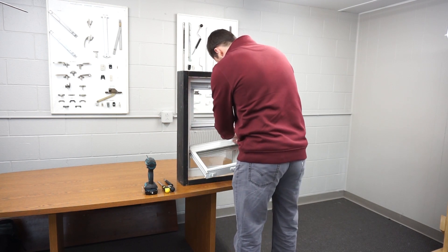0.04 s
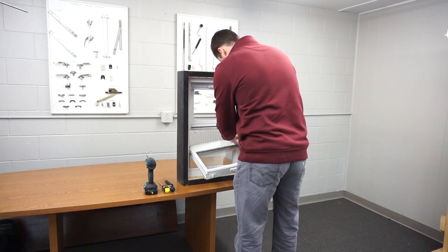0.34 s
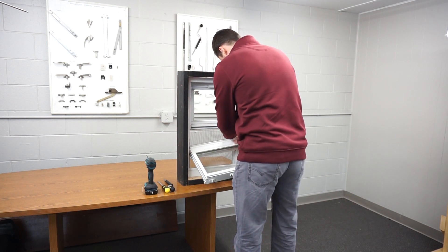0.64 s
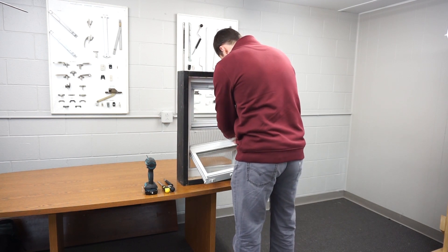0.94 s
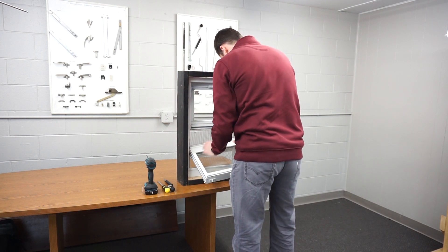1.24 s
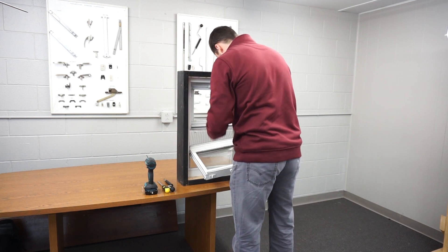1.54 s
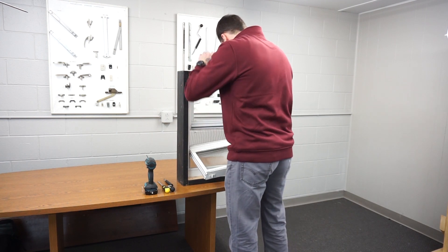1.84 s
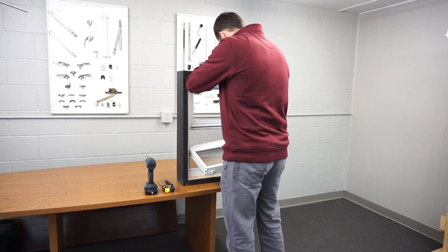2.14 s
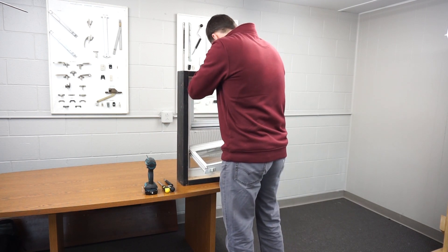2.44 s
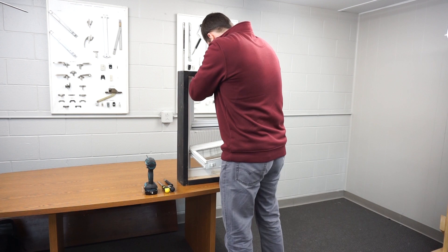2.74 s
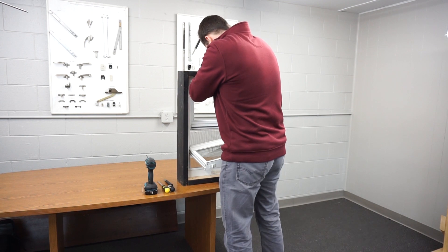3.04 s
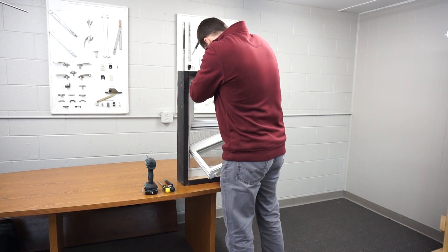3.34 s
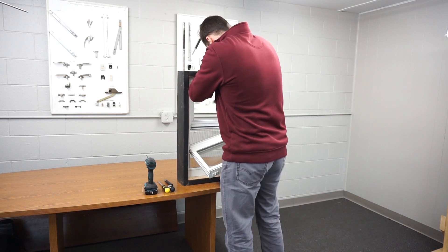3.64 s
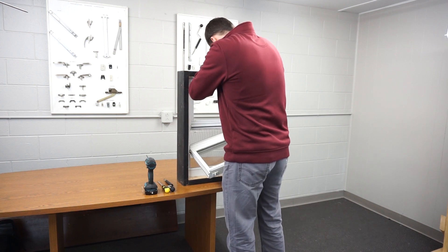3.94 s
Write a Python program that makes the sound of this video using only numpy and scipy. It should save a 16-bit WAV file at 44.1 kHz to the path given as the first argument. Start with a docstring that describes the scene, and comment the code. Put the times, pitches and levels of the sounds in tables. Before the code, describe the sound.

After soft clicks and rustles of handling, a vinyl window sash gives two short squeaks, knocks to a stop and latches with a snap. One microphone picks it up with a brief ring off bare walls.

```python
"""A vinyl window sash is pulled along its track: it squeaks twice, bumps to a stop and a latch snaps.
The window stands on a table in a bare block-walled room, heard on one microphone. Before the pulls,
small parts click over a low handling rumble and a sleeve rustles. The squeak is vinyl sticking and
slipping; knocks set the frame ringing. Squeaks, knocks and clicks reach the microphone directly,
then as a brief ring off the walls."""
import sys
import numpy as np
from scipy import signal
from scipy.fft import rfft, irfft
from scipy.io import wavfile
from scipy.ndimage import uniform_filter1d

SR = 44100
rng = np.random.default_rng(int(sys.argv[2]) if len(sys.argv) > 2 else 0)


def int16_out(signal):
    """Quantize to a 16-bit WAV file."""
    q = np.round(np.clip(np.atleast_2d(signal).T, -1, 1) * 32767)
    wavfile.write(sys.argv[1], SR, q.astype(np.int16))


N = 176400
T = np.arange(N) / SR

# Decay of the room: freq_hz, t60_s
ROOM_DECAY = [(100, 0.44), (500, 0.5366), (1200, 0.59), (2700, 0.13), (5500, 0.47), (9000, 0.33),
              (15000, 0.06)]
# Colour of its tail: freq_hz, gain_db
TAIL_COLOUR = [(100, -11.5), (250, -2.5), (520, -2.5), (1100, -1.5), (2500, -2), (6000, -5.5), (14000, -7)]
# Early reflections at the microphone: delay_s, gain
REFLECTIONS = [(.0042, 0.15), (0.0116, 0.095), (0.0192, 0.087), (0.027, 0.085)]

# Spectra of room tone, rumble, rubbing parts, sleeve, hands, fingers, track grit: freq_hz, relative_db
AIR_SPECTRUM = [(20, 14.5), (70, -14.5), (160, -3.5), (300, -20), (1000, -41.5), (3000, -26.5), (8000, -43),
                (16000, -49)]
RUMBLE_SPECTRUM = [(10, 5.5), (25, 3.5), (45, -0.5), (75, -1.5), (120, -11), (200, -23.5), (300, -44.5),
                   (600, -40), (2000, -80.5)]
PARTS_SPECTRUM = [(100, 7.5), (300, 7.5), (700, 1.5), (1300, -3), (1700, -10.5), (2800, -13.5),
                  (3800, -11.5), (4500, -12.5), (5500, -14.5), (7500, -17.5), (11000, -22), (16000, -26.5)]
SLEEVE_SPECTRUM = [(500, -10), (2000, 0), (4000, -7.5), (6000, -0.5), (9000, -2.5), (12000, -3),
                   (14500, -2), (16000, 1.5)]
HANDS_SPECTRUM = [(60, 11), (150, -4.5), (280, -0.5), (600, -1), (1200, -13), (2000, -15.5), (4000, -33.5),
                  (10000, -43)]
FINGER_SPECTRUM = [(1000, -23), (5000, -6), (8000, -10), (11000, 0.5), (13500, -12), (16000, -4)]
GRIT_SPECTRUM = [(150, -12), (500, 5.5), (1100, 2), (2000, -1.5), (3500, -10.5), (7000, -10.5),
                 (10000, -21.5), (15000, -21.5)]
# Rise and fall of the handling noises: time_s, level_db
RUMBLE_CURVE = [(0, -34), (.1, -29), (.25, -33), (.5, -31.5), (.6, -33), (.95, -38.5), (1.1, -47),
                (1.3, -53.5), (1.45, -57), (1.65, -54.5), (1.77, -44.5), (1.9, -55), (2.3, -47),
                (2.62, -59), (2.8, -39), (2.86, -43.5), (3.0, -34), (3.22, -50), (3.29, -47.5),
                (3.36, -35.5), (3.47, -42), (3.7, -56), (4, -59)]
PARTS_CURVE = [(0, -52.5), (.1, -55.5), (.22, -57.5), (.45, -61.5), (.6, -65), (.9, -62.5), (1.1, -70.5),
               (1.4, -77.5), (1.57, -68), (1.63, -59.5), (1.68, -54), (1.75, -69), (2, -63.5), (4, -67.5)]
SLEEVE_CURVE = [(0, -83), (1.95, -74.5), (2.1, -66), (2.35, -64.5), (2.47, -64.5), (2.58, -62.5),
                (2.7, -65.5), (2.77, -57.5), (2.87, -68.5), (2.93, -58.5), (3.0, -68), (3.2, -68),
                (3.6, -73), (3.78, -69.5), (3.85, -84.5), (4, -71.5)]
HANDS_CURVE = [(0, -88), (1.5, -76.5), (1.85, -58.5), (2.07, -59), (2.2, -59), (2.45, -54), (2.66, -54),
               (2.76, -44.5), (2.86, -60.5), (2.93, -40), (3.02, -61.5), (3.7, -57.5), (3.82, -53.5),
               (3.9, -66), (4, -60)]
# Fingers brushing over plastic: centre_s, length_s, level_db
FINGER_STROKES = [(0.063, .07, -71), (0.328, 0.032, -61), (0.48, 0.012, -62), (0.532, 0.066, -68.5),
                  (0.647, 0.036, -66), (0.84, 0.055, -66), (1.535, .04, -74)]

# Thuds through the table and clinks of a small metal catch: start_s, level_db
TABLE_THUDS = [(0.194, -37.5), (1.700, -51), (2.150, -55), (2.925, -48), (2.975, -35.5), (3.327, -26),
               (3.570, -45.5)]
CATCH_CLINKS = [(0.064, -72), (0.354, -61), (0.854, -41.5)]
# Resonances of table, catch and window frame: freq_hz, t60_s, relative_db
TABLE_MODES = [(52, 0.33, -11.5), (71.6, 0.43, 0), (113.2, 0.07, -2.5), (169, 0.054, -1)]
CATCH_MODES = [(1880, 0.013, -0.5), (2014, 0.027, -4), (3410, 0.027, -4.5), (4350, .025, -4),
               (4720, 0.016, 3), (4950, .02, -10)]
FRAME_MODES = [(189, 0.069, 4.5), (234, .06, -2.5), (289.2, 0.18, 2.5), (344.4, 0.33, -4.5),
               (562, 0.042, 5.5), (810, 0.19, -7.5), (1022.4, 0.14, -0.5), (1092, 0.13, -3),
               (1302, 0.042, 0.5), (1864, 0.017, 3.5), (2052, 0.018, 5), (2700, 0.032, 0)]
# Ticks of stressed plastic: start_s, level_db, upper_modes_db
PLASTIC_TICKS = [(1.52, -66, -2), (2.269, -65, -23), (2.388, -58.5, -30), (3.578, -50, -5),
                 (3.714, -56, -0.5), (3.920, -61, 0)]
# Resonances of the plastic: freq_hz, t60_s
PLASTIC_MODES = [(2420, 0.0057), (4000, 0.0071), (4650, 0.01)]
# Knocks of sash and frame, relative levels in four bands: start_s, bass_db, middle_db, treble_db, top_db
SASH_KNOCKS = [(0.001, -54, -39, -48, -58), (0.051, -48, -41.5, -48, -69), (0.062, -47, -33, -42, -64),
               (0.077, -39, -46, -63, -56.5), (0.194, -44, -71, -68, -84), (0.264, -44.5, -43.5, -62, -73),
               (0.353, -51, -40, -49.5, -77), (0.398, -47.5, -51.5, -63, -74),
               (0.513, -46, -55.5, -57, -80), (0.682, -54.5, -56, -56.5, -66),
               (0.795, -54, -51.5, -60, -71), (0.854, -49, -41.5, -45, -55), (0.999, -64, -71, -64.5, -64),
               (1.499, -58, -67, -72, -84), (1.692, -32.5, -33.5, -50.5, -65),
               (1.703, -33.5, -52, -66, -82), (1.73, -54, -51, -65, -63), (2.151, -37.5, -48.5, -63, -76),
               (2.352, -46, -53.5, -78, -74), (2.388, -49.5, -51.5, -60.5, -78),
               (2.746, -45, -56, -54.5, -57), (2.77, -43, -45.5, -61, -71), (2.797, -44, -50, -68, -71),
               (2.867, -50, -55.5, -80, -73), (2.901, -38, -38.5, -70, -72),
               (2.917, -37.5, -42.5, -55, -62), (2.928, -41, -41, -54.5, -63),
               (2.963, -31, -25.5, -64.5, -67), (3.094, -39, -33.5, -58.5, -64),
               (3.256, -38, -44.5, -59, -65), (3.329, -15.5, -20.5, -32.5, -46.5),
               (3.337, -28, -31, -40.5, -40.5), (3.356, -33, -21, -30, -37), (3.435, -33.5, -23, -26, -29),
               (3.462, -36, -33, -31.5, -43), (3.578, -66, -41, -47, -55.5),
               (3.764, -46.5, -58, -75.5, -76)]
# The rattle in each of those bands: low_hz, high_hz, t60_s, rebound_gain
RATTLE_BANDS = [(135, 366, 0.042, 0.086), (426, 1233, 0.063, 0), (1600, 5320, 0.048, 0.071),
                (5430, 16500, 0.036, 0.1)]

# The sash slipping in its track, one list per pull: time_s, pitch_hz, level_db, overtones_db, grit_db
SASH_PULLS = [
    [(2.935, 597, -69, -3, -3), (2.949, 567.4, -35.5, -3.5, -17.5), (2.956, 555, -21.5, -16.5, -30),
     (2.962, 523, -12.5, -11.5, -40), (2.969, 511, -18.5, -3.5, -33), (2.977, 503, -29.5, 3, -30),
     (2.986, 509, -45.5, -1, -16.5)],
    [(3.258, 494.6, -53, -8.5, -11), (3.273, 485.8, -38, -10, -13), (3.283, 503.3, -25, -7, -31),
     (3.297, 514, -17, 0, -25), (3.304, 531, -12.5, -9.5, -28), (3.311, 558.5, -8.5, -1, -30),
     (3.322, 549.5, -20, 10.5, -9.5), (3.329, 544, -22, 3.5, -7.5), (3.345, 555, -35.5, -1, 4)],
]
# Shape of the squeak's overtones: freq_hz, relative_db
OVERTONE_SPECTRUM = [(1050, -13.5), (1600, -29.5), (2100, -25.5), (2750, -26.5), (3300, -34), (4800, -45),
                     (7000, -51.5)]


def amp(db):
    """Decibels to gain."""
    return 10 ** (np.asarray(db) / 20)


def unit(x):
    """Scales to rms 1."""
    return x / np.sqrt(np.mean(x ** 2) + 1e-20)


def burst(x):
    """Scales a short sound to the energy of 15 ms at rms 1."""
    return x * np.sqrt(.015 * SR / (np.sum(x ** 2) + 1e-20))


def at_hz(points, hz):
    """Reads a table on a log-frequency axis."""
    freqs, values = np.transpose(points)
    return np.interp(np.log(hz + 1), np.log(freqs + 1), values)


def fader(curve):
    """A level curve as gain per sample."""
    return amp(np.interp(T, *np.transpose(curve)))


def add(mix, start_s, sound):
    """Mixes a sound in at a time."""
    part = mix[max(round(start_s * SR), 0):][:len(sound)]
    part += sound[:len(part)]


def coloured(x, spectrum):
    """Gives a signal a spectrum, at rms 1."""
    gain = amp(at_hz(spectrum, np.fft.rfftfreq(len(x), 1 / SR)))
    return unit(irfft(rfft(x) * gain, len(x)))


def wander(rate_hz):
    """Random drift of rms 1, mostly slower than rate_hz."""
    rolloff = 1 + (np.fft.rfftfreq(N, 1 / SR) / rate_hz) ** 4
    return unit(irfft(rfft(rng.standard_normal(N)) / rolloff, N))


def ring(x, hz, t60):
    """One resonance with gain 1 at its peak."""
    radius = np.exp(-np.log(1000) / (t60 * SR))
    pole = radius * np.exp(2j * np.pi * hz / SR)
    return 2 * signal.lfilter([1 - radius], [1, -pole], x).real


def friction(spectrum, grain_db, flutter_db):
    """Dense tiny slips of uneven size, coming in clumps."""
    slips = rng.standard_normal(N) * amp(grain_db * np.minimum(rng.exponential(1, N), 5))
    clumps = amp(flutter_db * wander(rate_hz=64))
    return coloured(slips * clumps, spectrum)


def struck(modes, attack_s):
    """The dying modes of a struck object."""
    t = T[:SR // 5]
    tones = np.zeros(len(t))
    for hz, t60, db in modes:
        tone = np.sin(2 * np.pi * (hz * t + rng.random()))
        tones += amp(db) * burst(amp(-60 * t / t60) * tone)
    return burst(tones * (1 - np.exp(-t / attack_s)))


def blows(events, modes, attack_s):
    """Strikes one object at each listed moment."""
    out = np.zeros(N)
    for start_s, db in events:
        add(out, start_s, amp(db) * struck(modes, attack_s))
    return out


def room_tone(level_db=-63):
    """The faint, steady air of the room."""
    return amp(level_db) * coloured(rng.standard_normal(N), AIR_SPECTRUM)


def room_ring(x, onset_s=0.0084):
    """What the bare walls return: early reflections, then a diffuse tail that dies faster in the treble."""
    hz, t, noise = signal.stft(rng.standard_normal(SR), SR, nperseg=256)
    t60 = at_hz(ROOM_DECAY, hz)[:, None]
    decay = amp(at_hz(TAIL_COLOUR, hz)[:, None] - 60 * t / t60)
    equal_energy = np.sqrt(2 * np.log(1000) / (t60 * SR))
    tail = signal.istft(noise * decay * equal_energy, SR, nperseg=256)[1][:SR]
    tail *= np.minimum(T[:SR] / onset_s, 1)
    for delay_s, gain in REFLECTIONS:
        add(tail, delay_s, np.array([gain]))
    return signal.fftconvolve(x, tail)[:N]


def handling_rumble(lumps_db=3.5):
    """The low, lumpy rumble of the window being handled."""
    lumps = amp(lumps_db * wander(rate_hz=15.7))
    return fader(RUMBLE_CURVE) * coloured(lumps * rng.standard_normal(N), RUMBLE_SPECTRUM)


def rustles():
    """Parts rub, a sleeve slides over the frame, hands shift on the sash, fingers brush the plastic."""
    parts = fader(PARTS_CURVE) * friction(PARTS_SPECTRUM, grain_db=4, flutter_db=0)
    sleeve = fader(SLEEVE_CURVE) * friction(SLEEVE_SPECTRUM, grain_db=4, flutter_db=1.4)
    hands = fader(HANDS_CURVE) * friction(HANDS_SPECTRUM, grain_db=1.5, flutter_db=2.6)
    strokes = sum(amp(db) * np.exp(-(2 * (T - centre_s) / length_s) ** 2)
                  for centre_s, length_s, db in FINGER_STROKES)
    fingers = strokes * friction(FINGER_SPECTRUM, grain_db=-1, flutter_db=1.5)
    return parts + sleeve + hands + fingers


def table_thuds():
    """Dull blows ring the low modes of the table under the window."""
    return blows(TABLE_THUDS, TABLE_MODES, attack_s=0.002)


def catch_clinks():
    """A small metal catch is struck and rings high and short."""
    return blows(CATCH_CLINKS, CATCH_MODES, attack_s=0.00047)


def plastic_ticks():
    """Stressed plastic lets go with a tick that dies within milliseconds."""
    out = np.zeros(N)
    for start_s, db, upper_db in PLASTIC_TICKS:
        modes = [(hz, t60, upper_db if k else 0) for k, (hz, t60) in enumerate(PLASTIC_MODES)]
        add(out, start_s, amp(db) * struck(modes, attack_s=0.00011))
    return out


def sash_knocks(gain_db=-5, impact_gain=0.58, rebound_s=0.00094, size=8192):
    """Each contact is a push and a short rattle that sets the frame ringing."""
    out, t, hz = np.zeros(N), T[:size], np.fft.rfftfreq(size, 1 / SR)
    push = 1. * (t == 0)
    frame = rfft(push + sum(amp(db) * ring(push, mode_hz, t60) for mode_hz, t60, db in FRAME_MODES))
    starts, *band_levels = np.transpose(SASH_KNOCKS)
    for levels, (low_hz, high_hz, t60, rebound_gain) in zip(band_levels, RATTLE_BANDS):
        bandpass = signal.butter(3, [low_hz, high_hz], "band", fs=SR, output="sos")
        band = rfft(signal.sosfilt(bandpass, push))
        rebound = 1 + rebound_gain * np.exp(-2j * np.pi * hz * rebound_s)  # a quick second contact
        decay = amp(-60 * t / t60)
        rattles = rng.standard_normal((len(starts), size)) * decay / np.linalg.norm(decay)
        knocks = irfft(rfft(rattles + impact_gain * push) * band * frame * rebound)
        for start_s, db, knock in zip(starts, levels, knocks):
            add(out, start_s, amp(db + gain_db) * burst(knock))
    return out


def squeak_overtones(hz, phase, shimmer_db=1.5, sway_rad=0.29):
    """Harmonics 2 to 13 of the squeak, each fluttering in level and phase."""
    out = np.zeros(len(hz))
    for k in range(2, 14):
        shimmer, sway = (unit(uniform_filter1d(noise, 200)) for noise in rng.standard_normal((2, len(hz))))
        gain = amp(at_hz(OVERTONE_SPECTRUM, k * hz) + shimmer_db * shimmer)
        out += gain * np.sin(k * phase + sway_rad * sway)
    return out


def sash_squeaks(jitter=0.024):
    """Stick and slip of vinyl: a near-pure tone that turns harsh and gritty as it jams."""
    out = np.zeros(N)
    for pull in SASH_PULLS:
        times, *columns = np.transpose(pull)
        sliding = (T >= times[0]) & (T <= times[-1])
        pitch_hz, db, overtones_db, grit_db = (np.interp(T[sliding], times, col) for col in columns)
        hz = pitch_hz * (1 + jitter * wander(rate_hz=300)[sliding])
        phase = 2 * np.pi * np.cumsum(hz) / SR
        tone = np.sqrt(2) * (np.sin(phase) + amp(overtones_db) * squeak_overtones(hz, phase))
        grit = friction(GRIT_SPECTRUM, grain_db=2.5, flutter_db=3)[sliding]
        grit *= 1 + 0.67 * np.cos(phase)  # pulses once per slip
        out[sliding] += amp(db) * (tone + amp(grit_db) * grit)
    return out


def scene():
    """The mono mix at the microphone; hits and squeaks ring the room from different places."""
    knocks, squeaks, ticks = sash_knocks(), sash_squeaks(), plastic_ticks()
    clinks, thuds = catch_clinks(), table_thuds()
    direct = knocks + squeaks + ticks + clinks + thuds
    hits_ring = room_ring(amp(-2.2) * knocks + amp(-18) * clinks + amp(-26) * ticks)
    squeaks_ring = room_ring(amp(-3.5) * squeaks)
    return (direct + hits_ring + squeaks_ring + rustles() + handling_rumble() + room_tone())[None]


def record(dry):
    """The recorder's band limit."""
    lowpass = signal.firwin(401, cutoff=15950, window=("kaiser", 8), fs=SR)
    return signal.oaconvolve(dry, lowpass[None], "same")


dry = scene()
out = record(dry)
int16_out(out)
```